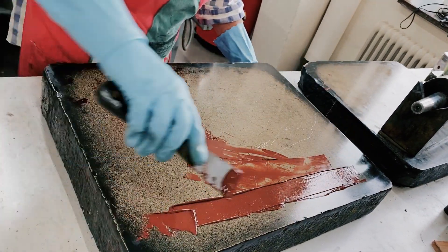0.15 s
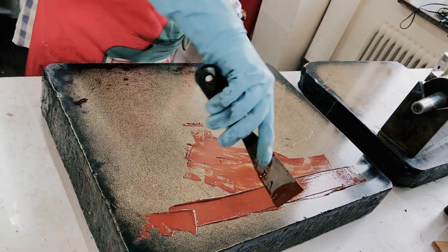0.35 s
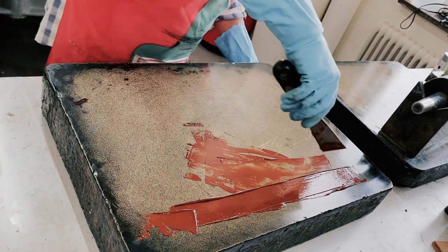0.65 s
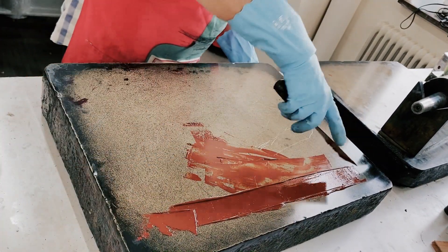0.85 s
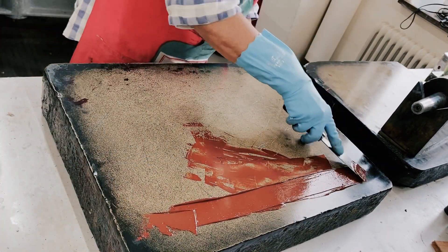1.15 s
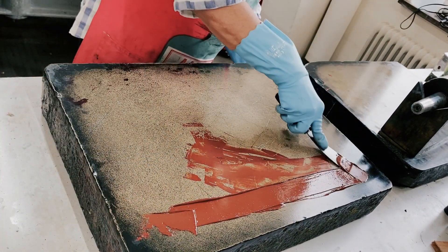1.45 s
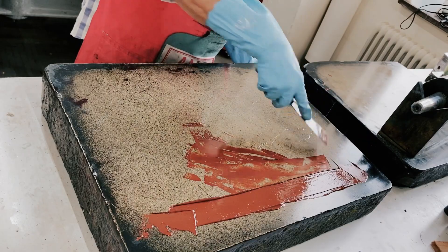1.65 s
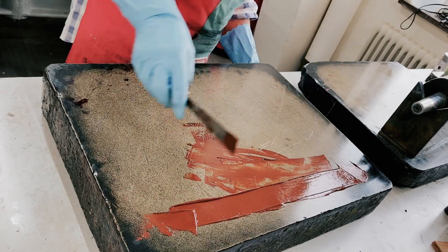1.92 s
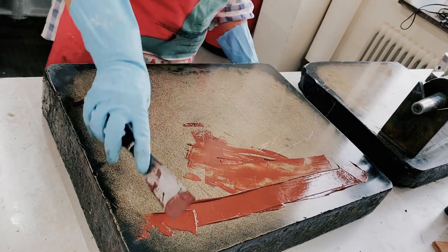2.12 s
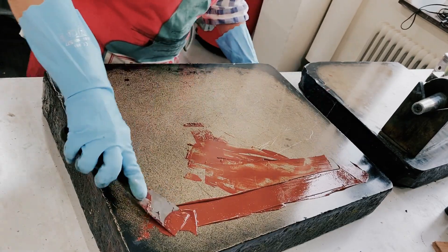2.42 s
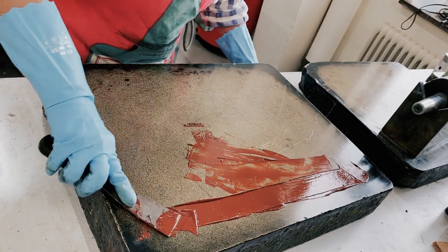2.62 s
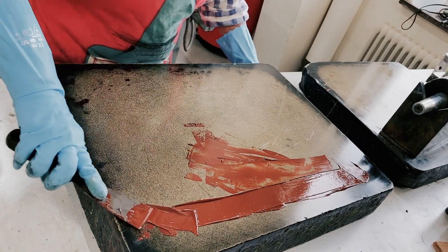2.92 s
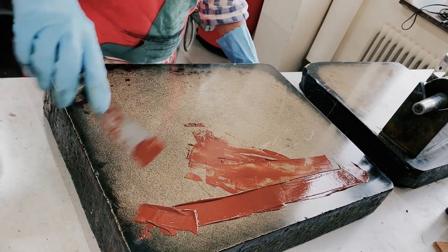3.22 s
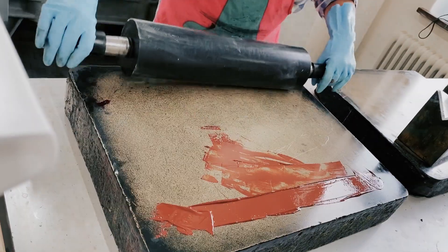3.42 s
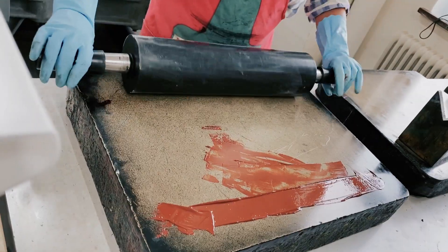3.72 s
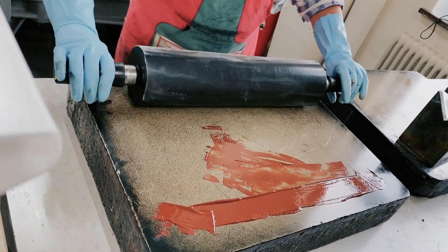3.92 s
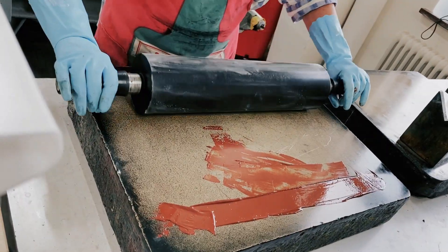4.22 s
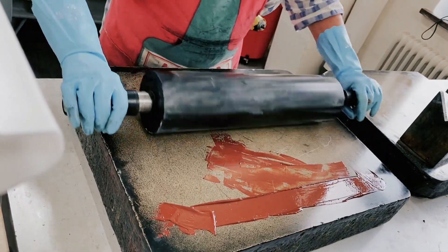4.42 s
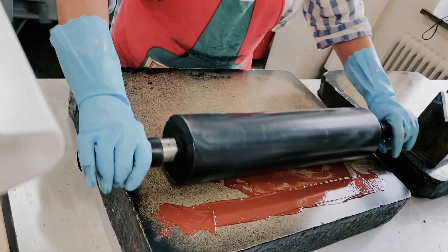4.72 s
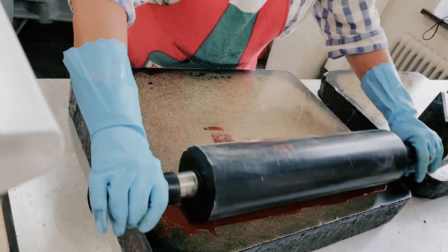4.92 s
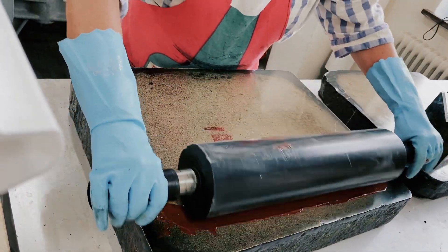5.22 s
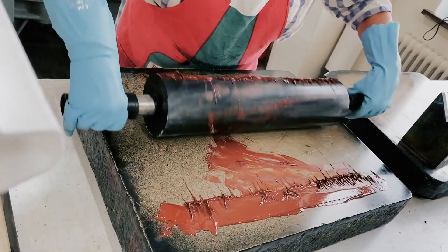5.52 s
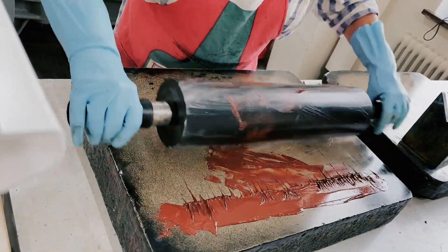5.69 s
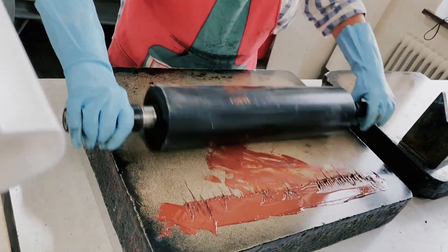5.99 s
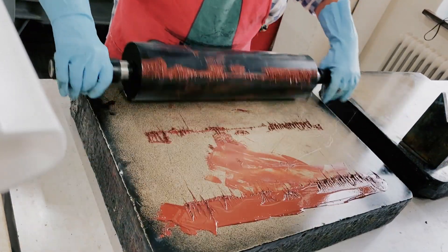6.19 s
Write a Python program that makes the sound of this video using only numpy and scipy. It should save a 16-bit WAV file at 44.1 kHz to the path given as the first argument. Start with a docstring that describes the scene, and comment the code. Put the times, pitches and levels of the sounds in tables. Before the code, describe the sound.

In a quiet small studio, a steel knife lightly taps and rubs a stone slab over a soft hiss, ending with a short scrape and springy metallic flick. The hiss stops; a heavy rubber roller clatters down, booms and rumbles, rolls out with sticky snaps and back with crackling ink, then lands harder. Close stereo microphone.

```python
"""Spreading and rolling printing ink

A steel knife spreads printing ink on a stone slab in a quiet studio, over a soft steady hiss: taps ring the
damped blade, and a scrape ends in a flick that frees it to ring. A heavy rubber roller is set down, rolled out
and back, lifted and dropped again: blows excite the modes of the bench, which booms and rumbles, and threads of
tacky ink tear behind the roller as random clicks, heard as a fine hiss and a few sharp snaps."""
import sys
import numpy as np
from scipy import signal
from scipy.fft import rfft, irfft
from scipy.io import wavfile
from scipy.ndimage import uniform_filter1d

SR = 44100
rng = np.random.default_rng(int(sys.argv[2]) if len(sys.argv) > 2 else 0)


def materialize(psi):
    """Save the field psi as 16-bit PCM at rate SR to the path in sys.argv[1].

    A 1-D psi becomes a single channel; in a 2-D psi each row is a channel.
    """
    bounded = np.clip(np.atleast_2d(psi).T, -1, 1)
    quanta = np.round(bounded * 32767).astype(np.int16)
    wavfile.write(sys.argv[1], SR, quanta)


N = 280035
TIME = np.arange(N) / SR
FREQS = np.maximum(np.arange(N // 2 + 1) * SR / N, 1)   # of the spectrum bins, in Hz

# A colour is a spectrum; its levels are relative, since the coloured signal is scaled to rms 1.
# A movement swells to its level, holds and dies away; its attack and release are the times for 20 dB.
# modes of the knife held against the stone: pitch_hz, level_db, t60_s
PRESSED_BLADE = [(717, -11.5, 0.026), (1020, -14, 0.054), (1450, 8, 0.016), (2150, -3, 0.055),
                 (2960, 3.5, 0.064), (3696, 12, 0.025), (4290, 1.5, 0.049), (4920, 0.5, 0.043),
                 (7310, 3, 0.013)]
# blows on the bench: start_s, level_db, contact_s, place (0 far edge to 1 middle of the slab),
# thud_hz, boom_db, boom_t60_s
THUMPS = [(3.444, -36, 0.0017, 0.35, 167, -31, 1.2), (3.523, -17.5, 0.0027, 0, 197, -31.5, 4),
          (3.547, -25.5, 0.0024, 0.067, 185, -26, 1.4), (4.252, -42, 0.0031, 0.1, 136, -46, 0.25),
          (5.276, -33, 0.0033, 0.64, 119, -35, 0.9), (5.848, -21, 0.003, 0.58, 192, -30, 0.34),
          (5.855, -9.5, 0.003, 0.93, 144, -27, 2), (6.059, -35, 0.0015, 0.83, 131, -40, .5)]
# spectrum of tearing, tacky ink: frequency_hz, density_db_per_hz
TACK_COLOUR = [(600, -7), (1400, 6.5), (2400, 2.5), (3600, 10), (5000, 5.5), (7000, 8), (10000, 12),
               (13000, 12), (15500, 7.5)]
FLICK_S = 3.0553   # the blade springs free


def from_db(db):
    """Level to amplitude: 20 dB is a factor of ten."""
    return 10 ** (np.asarray(db) / 20)


def rms_one(x):
    """Normalization by the root of the mean power."""
    return x / np.sqrt(np.mean(x ** 2) + 1e-20)


def swell(s, hold_s, db, attack_s, release_s):
    """Exponential growth and decay: a gain that rises to its level at s, holds and dies away."""
    away = np.maximum((s - TIME) / attack_s, (TIME - s - hold_s) / release_s)
    return from_db(db - 20 * np.clip(away, 0, 10))


def together(levels):
    """Incoherent addition: unrelated sounds add in power."""
    return np.sqrt(sum(level ** 2 for level in levels))


def gains(movements):
    """Incoherent addition of a table of movements into one gain curve."""
    return together(swell(*row) for row in movements)


def at_hz(points, hz):
    """Interpolation of a spectrum along a logarithmic frequency axis."""
    f, value = np.transpose(points)
    return np.interp(np.log(hz), np.log(f), value)


def colour(x, spectrum):
    """Linear filtering in the frequency domain, then scaling to rms 1."""
    weighted = rfft(x) * from_db(at_hz(spectrum, FREQS))
    return rms_one(irfft(weighted, N))


def cut(x, hz, kind):
    """Second-order low- or high-pass filtering."""
    sos = signal.butter(2, min(hz, .45 * SR), kind, fs=SR, output="sos")
    return signal.sosfilt(sos, x + 1e-18)


def resonate(x, hz, width_hz):
    """Resonance of a damped oscillator, with gain 1 on top."""
    r = np.exp(-np.pi * width_hz / SR)
    zeros = np.array([1, 0, -1]) * (1 - r * r) / 2
    poles = [1, -2 * r * np.cos(2 * np.pi * hz / SR), r * r]
    return signal.lfilter(zeros, poles, x + 1e-18)


def ring(force, modes):
    """Modal superposition: a unit impulse sets each damped mode ringing at its own level."""
    out = 0
    for hz, db, t60 in modes:
        r, w = from_db(-60 / (t60 * SR)), 2 * np.pi * hz / SR
        poles = [1, -2 * r * np.cos(w), r * r]
        out = out + from_db(db) * signal.lfilter([0, np.sin(w)], poles, force + 1e-18)
    return out


def fade(t60, size):
    """Exponential decay by 60 dB in t60 seconds."""
    return np.exp(-np.log(1000) * TIME[:size] / t60)


def add(track, s, sound):
    """Linear superposition: mix a sound into a track at a time in seconds."""
    i = round(s * SR)
    track[i:i + len(sound)] += sound[:N - i]


def grains(per_s, spread_db):
    """Shot noise: random tiny clicks of either sign, a few much larger than the rest."""
    sizes = from_db(max(spread_db, 0) * np.minimum(rng.exponential(1, N), 4.5))
    present = rng.random(N) < per_s / SR
    return present * sizes * rng.choice([-1, 1], N)


def clumping(spread_db, rate_hz):
    """Random amplitude modulation: a gain in uneven lumps at about this rate."""
    lumps = [(rate_hz / 10, -20), (rate_hz, 0), (rate_hz * 10, -50)]
    return from_db(spread_db * colour(rng.standard_normal(N), lumps))


def beating(spectrum, even_s):
    """Interference of close frequencies: noise that beats, its running power evened over even_s."""
    x = colour(rng.standard_normal(N), spectrum)
    return x / np.sqrt(uniform_filter1d(x * x, int(even_s * SR) + 1) + 1e-6)


def diffuse(spectrum):
    """Coherence of a diffuse field: stereo noise, alike in the bass and nearly unrelated in the treble."""
    # left-right likeness: frequency_hz, correlation (-1 to 1)
    likeness = [(60, 0.84), (130, 0.95), (290, 0.67), (640, 0), (1400, 0.013), (7000, 0.096)]
    alike = np.clip(at_hz(likeness, FREQS), -1, 1)
    mid, side = rfft(rng.standard_normal((2, N)))
    both = np.sqrt(1 + alike) * mid
    opposed = np.sqrt(1 - alike) * side * [[1], [-1]]
    return colour(irfft(both + opposed, N), spectrum)


def ports(x):
    """Diffraction: treble bends round the housing to two ports unevenly; long waves reach both alike."""
    # microphone pair, for sound from the slab: frequency_hz, left_lead_rad
    port_lead = [(300, 0), (1300, .4), (2000, .3), (3600, 2.2), (4400, -.2), (6000, .3), (7500, -.4),
                 (8300, -3.6), (11500, -6.9), (16000, -12.4)]
    # the same pair: frequency_hz, left_minus_right_db
    port_balance = [(1300, 1), (2400, -2), (3000, 4.5), (3800, 5), (4500, 6), (8200, 3.5), (9200, 0.5),
                    (14000, 0)]
    spectrum = rfft(x)
    balance = from_db(at_hz(port_balance, FREQS) / 2)   # half to each side
    lead = np.exp(1j * at_hz(port_lead, FREQS))
    return irfft(np.array([spectrum * lead * balance, spectrum / balance]), N)


def studio(x, room_t60=0.44, treble_t60=0.12, near_t60=0.016, near_db=-13, far_db=-15, split_hz=4000):
    """Reverberation: quick reflections off slab and bench, then a room tail whose treble dies first."""
    noise = diffuse([(20, 2), (300, 2), (1000, 0.0069), (16000, 0)])[:, :SR]
    low, high = cut(noise, split_hz, "low"), cut(noise, split_hz, "high")
    tail = low * fade(room_t60, SR) - high * fade(treble_t60, SR)   # opposite signs join the bands
    tail = tail * (TIME[:SR] > .005)
    near = diffuse([(200, -8.5), (900, -1.0), (16000, -10.0)])[:, :SR]
    near = near * fade(near_t60, SR) * (TIME[:SR] > .001)
    echoes = (from_db(far_db) * rms_one(tail) + from_db(near_db) * rms_one(near)) / np.sqrt(SR)
    return signal.fftconvolve(x[None], echoes)[:, :N]


def air(level_db=-58.5):
    """Stationary noise: the steady diffuse background of the studio."""
    # spectrum: frequency_hz, density_db_per_hz
    air_colour = [(20, -19), (35, 4.5), (55, 3.5), (90, 0.5), (130, -2.5), (200, -1), (290, -13.5),
                  (500, -16.5), (900, -16.5), (2000, -23.5), (5000, -29.5), (9000, -36.5), (16000, -40)]
    return from_db(level_db) * diffuse(air_colour)


def dull_wash(rolling_wash, floor_db=-72.5):
    """Shaped diffuse noise: dull handling and rubbing, and the dull wash that follows the landings."""
    # swells of handling, rubbing and wash: start_s, hold_s, level_db, attack_s, release_s
    swells = [(1.17, 0.039, -64, 0.18, 0.13), (1.8, 0.15, -63, 0.16, 2.9), (2.5, 0.058, -60.5, 0.35, 0.13),
              (3.1, 0.03, -61.5, 0.28, 0.25), (3.39, 0.084, -56.5, 0.013, 0.23),
              (3.52, 0.0268, -51, 0.086, 0.3), (4.19, 0.072, -61, 0.068, 0.13),
              (5.89, 0.16, -48, 0.059, 0.27)]
    # spectrum: frequency_hz, density_db_per_hz
    wash_colour = [(250, 3), (450, 2), (800, -4), (1300, -8), (2000, -11.5), (3500, -18.5), (7000, -41)]
    # a faint steady floor lies under the swells
    return together([from_db(floor_db), gains(swells), rolling_wash]) * diffuse(wash_colour)


def smear(hiss_db=-68, hiss_end_s=3.287, lift_db=2, squeeze_s=0.043):
    """Steady hiss and friction: a soft background hiss stops abruptly; strokes swell it, stone rasps, ink crackles."""
    # knife strokes, before lift_db: start_s, hold_s, level_db, attack_s, release_s
    strokes = [(.58, 0.043, -63, 0.13, 0.2), (1.04, 0.029, -66.5, 0.26, 0.18),
               (1.56, 1.17, -67, 0.21, 0.38), (3.14, 0.12, -65.5, .2, .1)]
    # blade dragging lightly over the stone: start_s, hold_s, level_db, attack_s, release_s
    drags = [(1.19, 0.16, -69.5, 0.14, .08), (1.385, 0.012, -63, .04, .07),
             (2.42, 0.0063, -60, 0.019, 0.07)]
    # wet ink welling out from under the blade: start_s, level_db
    squeezes = [(.6, -66), (1.601, -50.5)]
    # spectra of hiss and rasp: frequency_hz, density_db_per_hz
    smear_colour = [(1290, -40), (2200, -7), (6110, -2), (8440, -11), (10700, -8), (12400, -16),
                    (14600, -18), (16000, -16)]
    drag_colour = [(600, 1.5), (1100, 5), (1600, 4), (2200, 2), (3500, -13), (6000, -19)]
    # lift_db raises the background hiss and the strokes alike
    strength = from_db(lift_db) * together([from_db(hiss_db), gains(strokes)])
    hiss = strength * (TIME < hiss_end_s) * diffuse(smear_colour)
    rasp = gains(drags) * colour(grains(per_s=1700, spread_db=1.0), drag_colour)
    welling = together(swell(s, 0, db, squeeze_s, squeeze_s) for s, db in squeezes)
    crackle = welling * colour(grains(per_s=4100, spread_db=2.0), TACK_COLOUR)
    return hiss + ports(rasp + crackle)


def knife_taps(scatter_db=0.5, knock_t60=0.037):
    """Impact excitation: each touch knocks dully on the stone and strikes the pressed blade's modes."""
    # knife tapping the slab: start_s, blade_db, tilt_db_per_octave, knock_db
    touches = [(.9, -59, -8, -54.5), (1.156, -39, -15, -47.5), (1.163, -50.5, -6, -55),
               (1.39, -58, -10, -61), (1.64, -66.5, -0.5, -61), (2.212, -68.5, 5, -68),
               (2.406, -45, -8, -47), (2.412, -60, -17, -50.5), (2.539, -52, -27, -60),
               (2.595, -42, -27, -57)]
    # dead knock of the stone: frequency_hz, density_db_per_hz
    stone_colour = [(90, 1), (160, 15), (350, -2.5), (700, -3), (1100, 5), (1700, -8), (2200, 2.5),
                    (3000, -6.5), (4200, -32), (9000, -34)]
    blade = 0
    chance = rng.standard_normal((len(touches), len(PRESSED_BLADE)))
    for k, mode in enumerate(PRESSED_BLADE):
        force = np.zeros(N)
        octaves = np.log2(mode[0] / PRESSED_BLADE[0][0])   # above the lowest mode
        for (s, db, tilt_db, _), luck in zip(touches, chance[:, k]):
            add(force, s, from_db([db + tilt_db * octaves + scatter_db * luck]))
        blade = blade + (-1) ** k * ring(force, [mode])
    knock = np.zeros(N)
    for s, _, _, knock_db in touches:
        add(knock, s, from_db(knock_db) * fade(knock_t60, SR // 4))
    return blade + knock * beating(stone_colour, even_s=0.0058)


def bump():
    """Shaped diffuse noise: dull bumps elsewhere in the room, and something that scuffs along with them."""
    # bumps, then scuffs: start_s, hold_s, level_db, attack_s, release_s
    bump_moves = [(1.79, 0.034, -45, 0.01, 0.17), (1.895, .03, -47, .06, 0.34)]
    scuff_moves = [(1.855, 0.039, -55, 0.061, 0.17)]
    # their spectra: frequency_hz, density_db_per_hz
    bump_colour = [(40, -13), (80, -1), (120, 6.5), (175, -3.5), (250, -12), (400, -20), (700, -29),
                   (1500, -62)]
    scuff_colour = [(300, -2), (480, 3), (560, 9), (680, -1), (1020, 3), (1120, 11), (1230, 0), (1600, -3),
                    (2000, -12), (3200, -9), (5000, -34)]
    return gains(bump_moves) * diffuse(bump_colour) + gains(scuff_moves) * diffuse(scuff_colour)


def scrape(start_s=3.012, start_db=-46, growth_db=4, grit_db=-3, chatter_db=-4):
    """Stick-slip: the edge slips unevenly over the stone grain, ever harder, and shakes the pressed blade."""
    # spectrum of the grit: frequency_hz, density_db_per_hz
    scrape_colour = [(400, -31), (800, 8.5), (1100, -12), (1500, 4.5), (2100, -21), (3000, 6), (3800, -5),
                     (4600, 1), (5250, 8.5), (6200, -2), (9500, 7), (13000, 0), (15500, -1)]
    duration_s = FLICK_S - start_s
    progress = np.clip((TIME - start_s) / duration_s, 0, 1)
    pressure = swell(start_s, duration_s, start_db + growth_db * progress, attack_s=0.0019, release_s=0.01)
    grit = colour(grains(per_s=5700, spread_db=1.0), scrape_colour) * clumping(spread_db=1.5, rate_hz=130)
    slips = grains(per_s=700, spread_db=0.5)
    chatter = rms_one(cut(ring(slips, PRESSED_BLADE), 3000, "high"))
    return pressure * (from_db(grit_db) * grit + from_db(chatter_db) * chatter)


def flick(force_db=-40, spray_db=-42.5, spray_release_s=0.019, ring_lowest_hz=2300):
    """Free vibration: the released blade rings in its own modes, with a last burst of grit."""
    # the free blade's modes: pitch_hz, level_db, t60_s
    free_blade = [(2533, -6, 0.4), (4235, -8, 0.19), (5910, 8, 0.028), (7830, 5, 0.028), (9020, 8, 0.027),
                  (10900, -12, 0.08)]
    # spectrum of the burst: frequency_hz, density_db_per_hz
    spray_colour = [(2000, -16), (5000, -10), (9000, 0), (15500, 3)]
    release = np.zeros(N)
    add(release, FLICK_S, from_db([force_db]))
    burst = swell(FLICK_S, 0, spray_db, attack_s=.002, release_s=spray_release_s)
    spray = burst * colour(grains(per_s=7300, spread_db=3.0), spray_colour)
    return spray + cut(ring(release, free_blade), ring_lowest_hz, "high")


def short_knocks(relative_width=0.52, click_t60=0.023, click_hz=3500):
    """Heavily damped resonance: short dead sounds, each broad noise about one pitch and a bright click."""
    # knocks of roller and handles, a faint puff, a tick and the pop of an ink snap:
    # start_s, knock_db, pitch_hz, t60_s, click_db
    knocks = [(3.443, -52, 1130, 0.031, -54), (3.468, -50, 2220, 0.029, -46), (3.474, -43, 596, 0.034, -70),
              (3.521, -42.5, 1310, 0.033, -44.5), (3.534, -39.5, 2430, 0.018, -39.5),
              (3.547, -36, 2710, 0.014, -43), (3.552, -41, 565, 0.033, -58), (3.568, -38.5, 450, .045, -54),
              (4.0103, -62.5, 4480, 0.19, -56), (4.913, -36, 3700, 0.004, -69),
              (4.9114, -41, 1690, 0.0065, -73), (5.274, -39.5, 560, 0.016, -55),
              (5.8456, -32, 1720, 0.019, -40), (5.856, -30, 755, 0.056, -33.5),
              (5.867, -32, 1070, 0.013, -28), (5.876, -25.5, 2440, 0.025, -33),
              (6.032, -37, 1520, 0.032, -45), (6.0585, -11.5, 1214, 0.0069, -43),
              (6.063, -32, 1230, 0.0094, -43)]
    out, size = np.zeros(N), SR // 8
    noises = rng.standard_normal((len(knocks), 2, size))
    for (s, db, hz, t60, click_db), noise in zip(knocks, noises):
        width_hz = relative_width * hz
        body = resonate(resonate(noise[0], hz, width_hz), hz, width_hz)
        decay = fade(t60, size)
        knock = from_db(db) * rms_one(body * decay) * np.sqrt(np.mean(decay ** 2))
        click = from_db(click_db) * cut(noise[1], click_hz, "high") * fade(click_t60, size)
        add(out, s, cut(knock, hz / 2, "high") + click)
    return out


def thumps(lowest_hz=45, thud_cycles=0.92, thud_steepness=3.6):
    """Modal coupling: the rubber thuds for a few cycles; the bench rings by where it is struck."""
    # modes of bench and slab: pitch_hz, edge_db, middle_db, t60_s
    bench = [(64.2, -14, -16, 0.4), (74.84, -12, -18, 0.99), (115.5, -24.5, -26.5, 1.14),
             (143.8, -22, -14, 0.91), (180.6, -31, -20, 0.32), (227.7, -13.5, -22.5, 0.89),
             (250.6, -29, -5, 0.13), (292.2, -21.5, -23.5, 0.67), (341, -15, -24, 0.45),
             (398, -19, -29, 0.5), (550, -29, -15, 0.12), (625, -24, -4, 0.18)]
    out = np.zeros(N)
    for s, db, contact_s, place, thud_hz, _, _ in THUMPS:
        force = np.zeros(N)
        push = np.sin(np.linspace(0, np.pi, int(contact_s * SR) + 3))
        add(force, s, from_db(db) * push / push.sum())
        modes = [(hz, np.interp(place, [0, 1], [edge_db, middle_db]), t60)
                 for hz, edge_db, middle_db, t60 in bench]
        out += ring(force, modes)
        cycles = thud_hz * TIME[:SR // 10]
        age = cycles / thud_cycles   # the thud peaks at age 1
        envelope = np.power(age * np.exp(1 - age), thud_steepness)
        add(out, s, from_db(db) * envelope * np.sin(2 * np.pi * cycles))
    return cut(out, lowest_hz, "high")   # the slowest motion radiates nothing


def rumble(rolled, boom_attack_s=0.024, jolt_db=-15, jolt_t60=0.4, shudder_db=-24, shudder_t60=1.63):
    """Energy storage: a struck bench jolts, shudders and builds a deep boom; rolling keeps it trembling."""
    # spectra of boom and body: frequency_hz, density_db_per_hz
    boom_colour = [(20, -30), (40, -4), (56, 12.5), (70, 18), (82, 12.5), (98, 3), (140, -60)]
    body_colour = [(75, -32.5), (115, 8.5), (150, 4.5), (190, -6), (240, -12), (330, -22.5), (480, -32),
                   (900, -49)]
    boom_power, body_power = np.zeros(N), rolled ** 2
    build_up = 1 - np.exp(-TIME / boom_attack_s)
    # both relative to the blow
    shudder = from_db(jolt_db) * fade(jolt_t60, N) + from_db(shudder_db) * fade(shudder_t60, N)
    for s, db, _, _, _, boom_db, boom_t60 in THUMPS:
        add(boom_power, s, (from_db(boom_db) * build_up * fade(boom_t60, N)) ** 2)
        add(body_power, s, (from_db(db) * shudder) ** 2)
    boom = np.sqrt(boom_power) * beating(boom_colour, even_s=0.07)
    body = np.sqrt(body_power) * beating(body_colour, even_s=0.07)
    return boom + body


def rolling(speed_up_s=0.12, slow_down_s=0.15):
    """Kinematics of each pass: returns speed (0 to 1) and the gains of hiss, rumble and wash that follow it."""
    # roller passes: start_s, end_s, hiss_db, rumble_db, wash_db
    passes = [(3.53, 3.996, -67.5, -56.5, -59), (4.107, 5.05, -64.5, -59.5, -69),
              (5.154, 5.674, -61.5, -63, -64.5), (5.865, 6.37, -52.5, -59, -58.5)]
    out = 0
    for start, end, hiss_db, rumble_db, wash_db in passes:
        speed = np.clip(np.minimum((TIME - start) / speed_up_s, (end - TIME) / slow_down_s), 0, 1)
        out = out + np.outer(from_db([0, hiss_db, rumble_db, wash_db]), speed)
    return out


def rattle():
    """Forced vibration: heavy landings shake a ragged, dying crunch out of loose things on the bench."""
    # rattling after the roller lands: start_s, hold_s, level_db, attack_s, release_s
    shakes = [(3.532, 0.015, -43, 0.014, 0.099), (5.86, 0.013, -36, .012, 0.085)]
    # spectrum: frequency_hz, density_db_per_hz
    rattle_colour = [(150, -17), (300, 6), (650, -4.5), (1300, -14), (2500, -15.5), (5000, -22.5),
                     (10000, -28)]
    crunch = colour(grains(per_s=2000, spread_db=1.0), rattle_colour)
    return gains(shakes) * clumping(spread_db=1.5, rate_hz=126) * crunch


def tack(speed, rolling_hiss, clump_db=1.0):
    """Shot noise: the fine hiss of rolling rubber and of tearing ink threads, denser in clicks when louder."""
    # patches of thick ink peeling off the roller: start_s, hold_s, level_db, attack_s, release_s
    peels = [(4.51, 0.0017, -44, .008, 0.049), (4.612, 0.0038, -48.5, 0.073, 0.31),
             (5.37, 0.052, -45.5, 0.069, 0.04), (5.44, 0.033, -39.5, .02, 0.048),
             (6.04, 0.02, -39, 0.25, 0.09), (6.125, 0.0094, -38, 0.017, 0.035),
             (6.245, 0.02, -43, 0.055, 0.017)]
    level = together([rolling_hiss, speed * gains(peels)])
    lumps = colour(rng.standard_normal(N), [(5, -64.0), (30, 36), (150, -39.0), (600, -23.5)])
    clumps = from_db(clump_db * lumps)
    clicks_per_s = 3500 * (0.31 + np.sqrt(level / level.max()))
    clicks = grains(clicks_per_s, spread_db=1.0) / np.sqrt(clicks_per_s)   # even power at any rate
    return level * clumps * colour(clicks, TACK_COLOUR)


def snaps(cluster=0.15, lowest_hz=1050):
    """Impulse response of a cavity: a thick thread and its neighbours break; the roller gap colours the crack."""
    # thick ink threads snapping: start_s, level_db, tilt_db_per_octave, t60_s
    threads = [(4.5096, -34.5, 1.5, 0.007), (4.6103, -8.5, 7.5, 0.0015), (4.612, -39, -5.5, 0.0093),
               (4.7515, -41, 5, 0.0017), (4.789, -44, 14, .005), (5.167, -44.5, 0, 0.0032),
               (5.183, -40.5, 2, .003), (5.2207, -26, -8.5, 0.0025), (5.2737, -17, -10.5, 0.0034),
               (5.279, -36, -6, 0.03), (5.369, -35, -4, 0.065), (5.4088, -26, 12, 0.0051),
               (5.442, -20.5, 15, 0.0054), (5.481, -26, 8, 0.012), (5.715, -54, -7, 0.0066),
               (5.752, -53, -3, 0.012), (5.938, -31.5, 6, 0.0046), (5.966, -25.5, 5, 0.0089),
               (6.033, -22.5, 3.5, 0.017), (6.039, -18.5, 1, 0.0057), (6.0565, -17, 4, 0.0073),
               (6.0581, -15, -2, 0.033), (6.127, -32, 7, 0.0093), (6.224, -30.5, 2, 0.013)]
    # resonances of the gap between roller and slab: pitch_hz, width_hz, level_db
    gap = [(1550, 440, -6), (3640, 1320, 3.5), (6720, 4000, 8), (9480, 9300, 5.5), (14800, 1100, 4.5)]
    out, size = np.zeros(N), SR // 10
    for (s, db, tilt_db, t60), noise in zip(threads, rng.standard_normal((len(threads), size))):
        decay = fade(t60, size)
        burst = cluster * noise * decay   # the neighbours
        burst[0] += 1   # the thick thread itself
        crack = 0
        for k, (hz, width_hz, gap_db) in enumerate(gap):
            tilted_db = gap_db + tilt_db * np.log2(hz / gap[0][0])
            crack = crack + (-1) ** k * from_db(tilted_db) * resonate(burst, hz, width_hz)
        crack = rms_one(cut(crack, lowest_hz, "high"))
        add(out, s, from_db(db) * crack * np.sqrt(np.mean(decay ** 2)))
    return out


def scene():
    """Superposition: tools and ink close by, the bench below, the studio around."""
    speed, rolling_hiss, trembling, rolling_wash = rolling()
    knife = knife_taps() + scrape() + flick()
    roller = short_knocks() + thumps() + rattle() + tack(speed, rolling_hiss) + snaps()
    close = knife + roller
    surroundings = air() + dull_wash(rolling_wash) + smear() + bump() + rumble(trembling)
    return ports(close) + studio(close) + surroundings


def record(dry, low_cut_hz=42.6, cutoff_hz=16200):
    """Band limiting: the microphone sheds the deepest bass; the top is cut steeply."""
    heard = cut(cut(dry, low_cut_hz, "high"), low_cut_hz, "high")
    steep = signal.ellip(10, .2, 80, cutoff_hz, fs=SR, output="sos")   # .2 dB ripple, 80 dB down
    return signal.sosfilt(steep, heard)


dry = scene()
out = record(dry)
materialize(out)
```